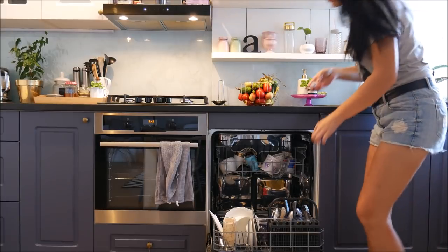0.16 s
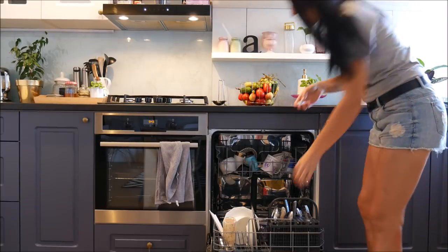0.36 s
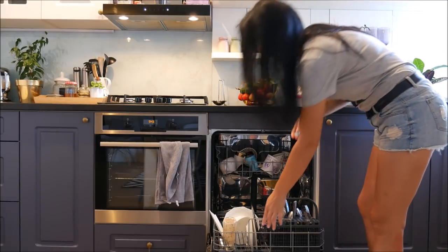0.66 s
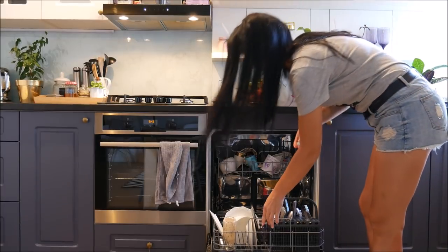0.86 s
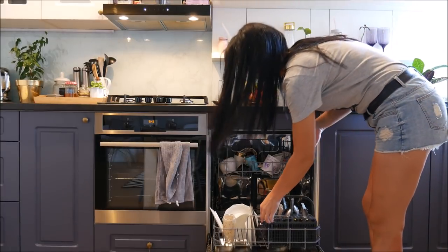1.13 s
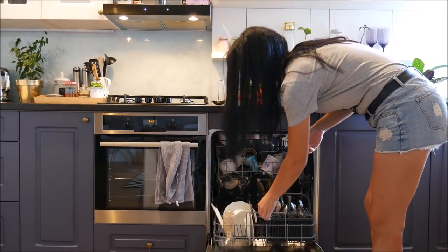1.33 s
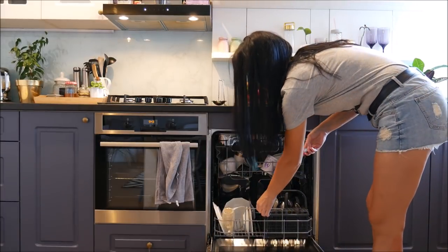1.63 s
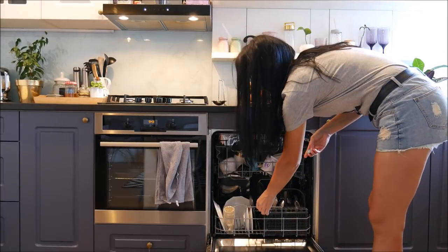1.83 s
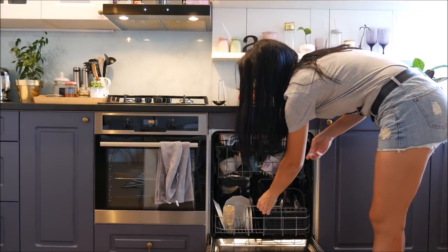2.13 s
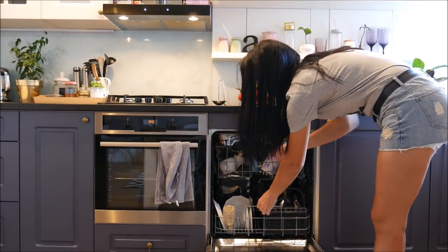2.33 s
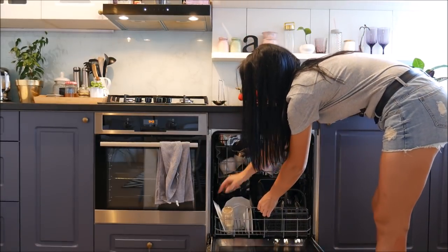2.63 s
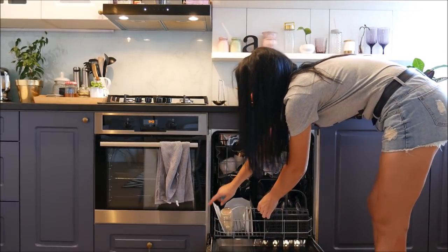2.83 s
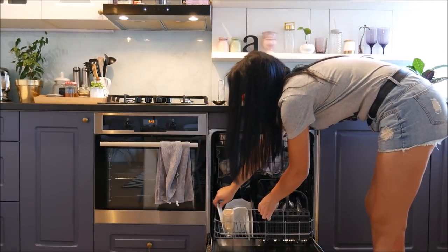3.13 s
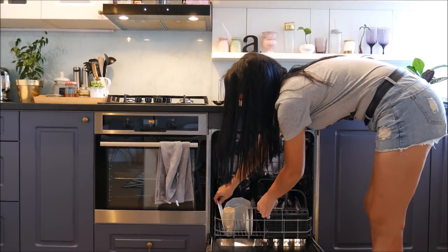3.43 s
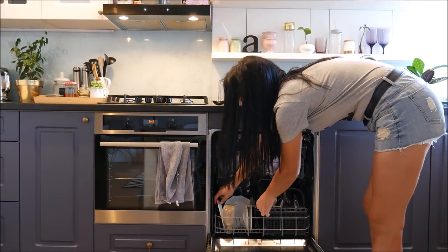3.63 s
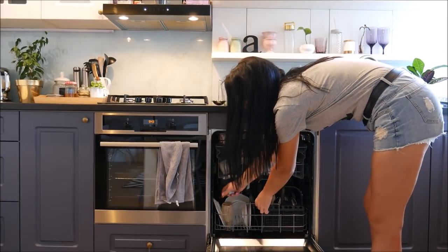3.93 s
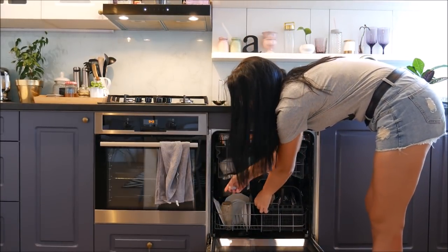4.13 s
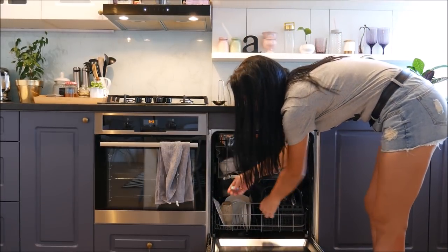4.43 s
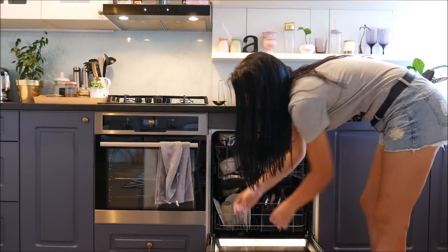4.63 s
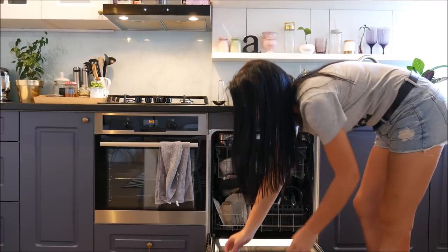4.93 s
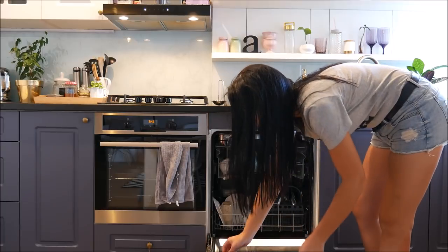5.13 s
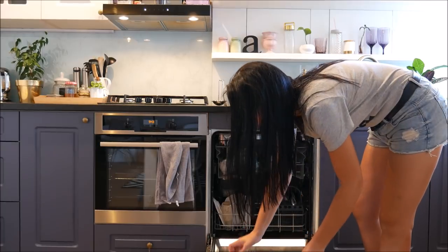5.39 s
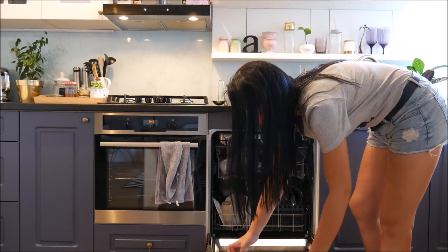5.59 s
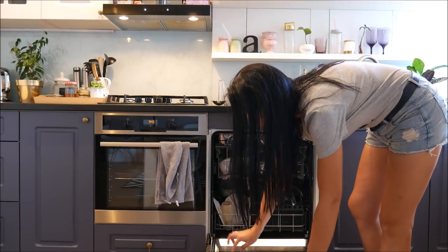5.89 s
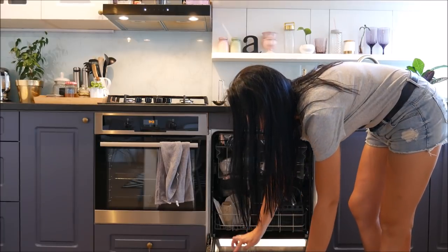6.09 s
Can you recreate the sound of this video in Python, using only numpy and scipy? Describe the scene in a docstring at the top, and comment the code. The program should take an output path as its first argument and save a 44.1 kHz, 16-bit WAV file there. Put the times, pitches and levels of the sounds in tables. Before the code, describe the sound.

A loaded lower dishwasher rack is pushed in bursts: low wheel rumble, rattling wire basket, dull tub bumps. Its main crash of plates comes early, ringing freely before choking off. Smaller clinks gather into another lively clatter midway, then only quiet knocks and footfalls remain until a hard double clack. Short bright kitchen reverberation, faint hush, stereo microphones nearby.

```python
"""China and cutlery clatter and clink amid duller knocks, wheel rumble and basket rattle; a sharp clack ends it.
Someone pushes the loaded lower rack of a dishwasher home in a hard-walled kitchen and reaches for the door.
Plates are banks of decaying sine modes; ticks, clacks and blows are short coloured noises;
wheels and basket wires are random grains shaped by the motion; the kitchen is decaying two-channel noise."""
import sys
import numpy as np
from scipy import signal
from scipy.fft import rfft, irfft, next_fast_len
from scipy.io import wavfile
from scipy.ndimage import uniform_filter1d, minimum_filter1d

SR = 44100
rng = np.random.default_rng(int(sys.argv[2]) if len(sys.argv) > 2 else 0)


def wav_out(sig):
    """Save sig, one row per channel (or a flat mono array), as 16-bit PCM at SR to the path in sys.argv[1]."""
    wavfile.write(sys.argv[1], SR, np.round(np.clip(np.atleast_2d(sig).T, -1, 1) * 32767).astype(np.int16))


N = 275709
TAIL_SAMPLES = next_fast_len(int(.65 * SR))
CONTACT_SAMPLES = int(.18 * SR)

# Single touches of china and cutlery. Each row: start in seconds, level in dB,
# upper over lowest modes in dB, ring time as a share of a free plate's.
CLINKS = [(1.324,-33.5,-9,0.13), (1.381,-31,5,0.39), (1.416,-34.5,10.5,0.4), (2.007,-40.5,5.5,0.16),
          (2.406,-73,20.5,0.82), (2.52,-41.5,0.5,0.088), (2.553,-35.5,4.5,0.16), (2.688,-30,2,0.13),
          (2.7,-33.5,-18,0.7), (2.719,-27,-2.5,0.3), (3.045,-30.5,2,0.12), (3.124,-39,7,0.14),
          (3.529,-61.5,-1,0.14), (3.59,-52.5,7.5,0.17), (3.616,-38,-2,0.097), (3.66,-44.5,-4,0.15),
          (3.723,-27.5,-7.5,0.49), (3.733,-26,-7.5,0.37), (3.785,-29,2.5,0.16), (3.843,-20.5,-5.5,0.2),
          (3.859,-27.5,4,0.56), (3.943,-38.5,-10,0.18), (4.099,-35.5,4.5,0.23), (4.159,-32.5,2.5,.36)]
# Bending modes of free plates. Each row: frequency in Hz, relative level in dB, t60 in seconds.
LOW_MODES = [(2297, -9, .28), (2336, -9, .24), (2430, -8, .14), (2503, 0, .4), (2555, -9, .11),
             (2720, -13, .16), (2940, -16, .14)]
UPPER_MODES = [(3560, -12, .14), (3724, -4.5, .32), (3790, -7, .14), (3862, -4, .24), (3962, 0, .3),
               (4008, -5, .2), (4440, -11, .24), (5160, -10, .18), (5240, -3, .25), (5300, -7, .2),
               (5868, -11, .22), (5924, -11, .22), (6238, -10, .24), (6805, -9, .24), (7196, -10, .18),
               (8320, -15, .26), (8930, -9, .22), (9640, -16, .24), (11000, -14, .24), (11250, -16, .24),
               (12290, -19, .24)]
PLATE_LONGEST_T60_S = .5
# The more freely a plate rings, the more its strongest modes stand out.
USUAL_RING_SHARE, SOLO_EXPONENT = 0.24, .45

# Spectra of the tick of a touch and the clack of the rack under it.
# Each row: frequency in Hz, relative density in dB per Hz.
TICK_SPECTRUM = [(1500, -26), (3000, -8), (5000, 3), (7000, 5.5), (9000, 2.5), (11000, -0.5),
                 (15000, -11.5)]
CLACK_SPECTRUM = [(60, -46.5), (150, -3), (400, -10.5), (750, 2), (1050, 2), (1350, 2), (1700, -2),
                  (2100, -1.5), (3200, -3), (6000, -38)]
# Tick and clack levels relative to the touch, then dB per dB of brightness and of force.
USUAL_TOUCH_DB = -35
TICK_DB, TICK_DB_PER_BRIGHTNESS_DB, TICK_DB_PER_FORCE_DB = -20.5, .9, 0.71
CLACK_DB, CLACK_DB_PER_BRIGHTNESS_DB, CLACK_DB_PER_FORCE_DB = -2.5, 0.78, -0.32
CLACK_TOP_BRIGHTNESS_DB = 6  # a brighter touch shakes the rack no more

# The rack hits its stop: the whole load joins in, chatters, holds, then dies away.
CRASH_S, CRASH_DB = 1.465, -14
CRASH_BUILD_DB, CRASH_BUILD_S = 2, 0.042
CRASH_HOLD_S, CRASH_FALL_DB_PER_S = 0.14, 165
CHATTER_GAP_S, CHATTER_JITTER_GAPS, CHATTER_SCATTER_DB = .0225, .1, -1.85
CRASH_BRIGHTNESS_DB, BRIGHTNESS_SCATTER_DB = 4, 2  # upper over lowest modes, and its spread
# The plates ring freely at first, then wedge against each other.
FIRST_RING_SHARE, WEDGED_RING_SHARE, WEDGING_S = 0.83, 0.3, 0.045

# Spectra of a blow's thump and panel. Each row: multiple of the part's pitch, relative density in dB per Hz.
THUMP_SPECTRUM = [(.2, -52), (.5, -30.5), (.82, -21.5), (1, 8.5), (1.2, -5.5), (1.7, -12), (3, -30.5),
                  (8, -58)]
PANEL_SPECTRUM = [(.15, -29), (.4, -3.5), (.65, -5.5), (.87, -1.5), (1, 2.5), (1.15, -7), (1.7, -13.5),
                  (3.5, -32), (9, -51)]
# Spectrum of a hard plastic snap. Each row: frequency in Hz, relative density in dB per Hz.
SNAP_SPECTRUM = [(700, -27.5), (1800, 7.5), (3500, 7), (6000, -1.5), (9000, -15.5), (15000, -19)]

# The rack bumps along its track. Each row: start in seconds, level in dB, boom of the tub in Hz.
BUMPS = [(1.324,-27,171.3), (1.362,-34,182), (1.464,-34,124.5), (1.64,-50,170), (2.01,-42,112.5),
         (3.785,-30.5,108), (4.039,-32.5,112), (4.188,-39.5,172)]
# The rack is jolted, then the tub booms. Each row: delay in seconds, thump in dB and panel in dB
# relative to the bump, panel in Hz.
JOLT = [(0,-0.5,-4,779), (.014,-8,-7,1074)]
RACK_THUMP_HZ = 328.2
BUMP_SNAP_DB, BUMP_TICK_DB = -7, -14.5  # relative to the panel

# Hard knocks on door, frame and crashing rack. Each row: start in seconds, panel in dB, panel in Hz,
# thump in dB, hardness in dB.
KNOCKS = [(.064,-61.5,1420,-67,2), (.756,-53,785,-66,-10), (0.963,-45.5,1920,-44.5,-2),
          (.977,-48,1150,-50.5,-2.5), (1.011,-45.5,1450,-58,-1), (1.157,-47.5,1320,-64,-2),
          (1.549,-20.5,1120,-35.5,6), (3.255,-44.5,1090,-59.5,3), (4.391,-50,1623,-62,2),
          (4.421,-52,1076,-69.5,3.5), (5.178,-37.5,930,-34.5,-1), (5.585,-65,553,-69.5,-5.5),
          (5.838,-58,1036,-70,2.5), (5.9,-41,1253,-45.5,-0.5), (6.147,-26,863,-35,3.5),
          (6.154,-33.5,827,-40,5.5)]
KNOCK_THUMP_HZ = 191
REBOUND_S, REBOUND_LOSS_DB = 0.02, 7
# Relative to the panel; snap also rises dB for dB with hardness.
KNOCK_SNAP_DB, KNOCK_TICK_DB, KNOCK_TICK_DB_PER_HARDNESS_DB = -6.5, -14.5, 3.2

# Footfalls. Each row: start in seconds, thump in dB, heel thump in Hz, floorboard in dB.
STEPS = [(.287,-45,315,-44), (2.444,-50.5,271,-60.5), (2.976,-40,290,-49), (4.955,-61,240.4,-67.5),
         (5.056,-44,228,-44.5)]
# Heel, sole and toe. Each row: delay in seconds, thump in dB relative to the step, thump pitch as a share
# of the heel's, floorboard in dB relative to the step, floorboard in Hz.
FOOTFALL = [(0,-3.5,1,-2,940), (.038,1,.8,-1.5,640), (.09,0,.74,-9,720)]
STEP_SNAP_DB, STEP_TICK_DB = -18.5, -20  # relative to the floorboard

# Pushes of the rack. Each row: start in seconds, end in seconds, wheel rumble in dB.
PUSHES = [(0.92,1.46,-44), (1.46,1.764,-39), (1.804,2.134,-48.5), (2.483,2.87,-44.5), (3.068,3.357,-50),
          (3.41,4.225,-43.5)]
PUSH_ATTACK_S, COAST_DB_PER_S = 0.055, 92
# Basket wires: relative to the rumble, relative to a touch's upper modes, and their decay after a touch.
WIRES_ROLLING_DB, WIRES_SHAKEN_DB, WIRES_T60_S = -17, -12.5, 0.34
# Spectra of wheels, basket wires and kitchen hush. Each row: frequency in Hz, relative density in dB per Hz.
RUMBLE_SPECTRUM = [(29, -58.5), (50, -32.5), (145, -6.5), (260, 3), (427, 1), (504, -2.5), (727, -3.5),
                   (812, -7), (1490, -11.5), (1850, -9.5), (4000, -27), (5200, -53.5), (8800, -120)]
RATTLE_SPECTRUM = [(1200, -8.5), (2500, -4.5), (4000, -2), (6500, -7.5), (10000, -4.5), (15000, -21)]
HUSH_SPECTRUM = [(15, -44), (25, -26), (54, -13), (207, 0), (462, -7.5), (978, -9.5), (1090, -15.5),
                 (1280, -10), (2700, -17), (5880, -22.5), (7890, -23), (9770, -21), (15000, -41.5)]
HUSH_DB = -65.5

# Decay of the kitchen. Each row: band centre in Hz, t60 in seconds.
ROOM_T60 = [(100, 0.22), (300, 0.41), (1000, 0.55), (3000, 0.42), (6000, 0.46), (12000, 0.3)]
# Likeness of left and right. Each row: frequency in Hz, correlation.
LIKENESS = [(40, 0.062), (150, 0.96), (400, 0.54), (1000, 0.73), (2400, 0.76), (4500, 0.96), (9000, 0.49),
            (13000, 0.7)]


def clinks(rooms, touches):
    """A touch ticks, sets the plates ringing and shakes the rack that holds them."""
    out = np.zeros((2, N))
    for k, (start_s, low_db, upper_db, tick_db, clack_db, ring) in enumerate(touches):
        room = rooms[k % len(rooms)]
        # the harder the contact, the more it wakes the highest modes
        tilt_db = np.clip(.3 * (tick_db - upper_db + 12), -3, 3)
        low = china(plates(LOW_MODES, ring), ring, room, tilt_db_per_octave=0, scatter_db=1.5)
        upper = china(plates(UPPER_MODES, ring), ring, room, tilt_db, scatter_db=2.5)
        tick = in_room(burst(TICK_SPECTRUM, t60_s=0.006, rise_s=0.0011), room)
        clack = in_room(burst(CLACK_SPECTRUM, t60_s=.08, rise_s=.002), room)
        ringing = from_db(low_db) * low + from_db(upper_db) * upper
        contact = from_db(tick_db) * tick + from_db(clack_db) * clack
        add(out, start_s, ringing + contact)
    return out


def china(modes, ring, room, tilt_db_per_octave, scatter_db):
    """Struck plates: each contact point favours other modes; leaning neighbours shorten the ring."""
    hz, db, t60_s = np.array(modes).T[:, :, None]
    pitch, strength, sign = rng.standard_normal((3, len(modes), 1))
    hz = hz * (1 + .0008 * pitch)
    gain = from_db(db + scatter_db * strength + tilt_db_per_octave * np.log2(hz / hz[0]))
    # mode levels hold at the microphones, whatever the room passes at their pitch
    room_power = uniform_filter1d(np.mean(np.abs(rfft(room)) ** 2, axis=0), size=11)
    passed = np.interp(hz, np.fft.rfftfreq(TAIL_SAMPLES, 1 / SR), room_power)
    gain = gain * np.sign(sign) / np.sqrt(passed)
    phase = np.float32(2 * np.pi * hz / SR) * np.arange(TAIL_SAMPLES, dtype=np.float32)
    waves = np.sin(phase) * dying(np.minimum(t60_s * ring, PLATE_LONGEST_T60_S))
    return in_room(np.sum(np.float32(gain) * waves, axis=0), room)


def plates(modes, ring):
    """The modes as one touch finds them: weak ones recede when the plate rings freely."""
    recession = max(ring / USUAL_RING_SHARE, 1) ** SOLO_EXPONENT
    return np.array(modes) * [1, recession, 1]


def all_touches():
    """Force and brightness share a touch out: s, lowest modes dB, upper modes dB, tick dB, clack dB, ring."""
    rows = []
    for start_s, db, bright_db, ring in list(CLINKS) + chatter():
        force_db = db - USUAL_TOUCH_DB
        clack_bright_db = min(bright_db, CLACK_TOP_BRIGHTNESS_DB)
        tick_db = db + TICK_DB + TICK_DB_PER_BRIGHTNESS_DB * bright_db + TICK_DB_PER_FORCE_DB * force_db
        clack_db = db + CLACK_DB + CLACK_DB_PER_BRIGHTNESS_DB * clack_bright_db
        clack_db += CLACK_DB_PER_FORCE_DB * force_db
        rows.append((start_s, db - bright_db / 2, db + bright_db / 2, tick_db, clack_db, ring))
    return rows


def chatter(count=14):
    """In the crash the plates strike each other in a quick, uneven run; rows as in CLINKS."""
    late, force, colour = rng.standard_normal((count, 3)).T
    strike = np.arange(count)
    after_s = CHATTER_GAP_S * (strike + CHATTER_JITTER_GAPS * late * (strike > 0))
    build_db = -CRASH_BUILD_DB * np.exp(-after_s / CRASH_BUILD_S)
    fall_db = -CRASH_FALL_DB_PER_S * np.maximum(after_s - CRASH_HOLD_S, 0)
    db = CRASH_DB + build_db + fall_db + CHATTER_SCATTER_DB * force
    bright_db = CRASH_BRIGHTNESS_DB + BRIGHTNESS_SCATTER_DB * colour
    freedom = np.exp(-after_s / WEDGING_S)
    ring = WEDGED_RING_SHARE + (FIRST_RING_SHARE - WEDGED_RING_SHARE) * freedom
    return list(zip(CRASH_S + after_s, db, bright_db, ring))


def knocks(rooms):
    """A heavy part thumps, sheet metal and boards answer in the middle, hard plastic snaps and ticks on top."""
    out = np.zeros((2, N))
    for k, (start_s, thump_db, thump_hz, panel_db, panel_hz, snap_db, tick_db) in enumerate(all_blows()):
        room = rooms[k % len(rooms)]
        thump = burst(np.array(THUMP_SPECTRUM) * [thump_hz, 1], t60_s=0.087, rise_s=0.012)
        panel = burst(np.array(PANEL_SPECTRUM) * [panel_hz, 1], t60_s=.065, rise_s=.0015)
        snap = burst(SNAP_SPECTRUM, t60_s=.025, rise_s=.001)
        tick = burst(TICK_SPECTRUM, t60_s=.024, rise_s=.0018)
        for db, part in (thump_db, thump), (panel_db, panel), (snap_db, snap), (tick_db, tick):
            add(out, start_s, from_db(db) * in_room(part, room))
    return out


def all_blows():
    """Feet roll from heel to toe, the rack jolts the tub, and each hard knock rebounds once."""
    rows = []
    for start_s, thump_db, heel_hz, board_db in STEPS:
        footfall = [(delay_s, thump, share * heel_hz, *board) for delay_s, thump, share, *board in FOOTFALL]
        rows += contacts(start_s, thump_db, board_db, footfall, STEP_SNAP_DB, STEP_TICK_DB)
    for start_s, db, boom_hz in BUMPS:
        jolt = [(delay_s, thump, hz, *panel)
                for (delay_s, thump, *panel), hz in zip(JOLT, (RACK_THUMP_HZ, boom_hz))]
        rows += contacts(start_s, db, db, jolt, BUMP_SNAP_DB, BUMP_TICK_DB)
    for start_s, panel_db, panel_hz, thump_db, hardness_db in KNOCKS:
        bounce = [(k * REBOUND_S, -k * REBOUND_LOSS_DB, KNOCK_THUMP_HZ, -k * REBOUND_LOSS_DB, panel_hz)
                  for k in (0, 1)]
        snap_db = KNOCK_SNAP_DB + hardness_db
        tick_db = KNOCK_TICK_DB + KNOCK_TICK_DB_PER_HARDNESS_DB * hardness_db
        rows += contacts(start_s, thump_db, panel_db, bounce, snap_db, tick_db)
    return rows


def contacts(start_s, thump_db, panel_db, pattern, snap_db, tick_db):
    """The contacts of one blow: s, thump dB, thump Hz, panel dB, panel Hz, snap dB, tick dB."""
    rows = []
    for delay_s, thump, thump_hz, panel, panel_hz in pattern:
        level_db = panel_db + panel
        rows.append((start_s + delay_s, thump_db + thump, thump_hz,
                     level_db, panel_hz, level_db + snap_db, level_db + tick_db))
    return rows


def burst(spectrum, t60_s, rise_s):
    """Many heavily damped modes merge into a short noise that swells while the contact closes."""
    closing = 1 - np.exp(-np.arange(CONTACT_SAMPLES) / SR / max(rise_s, 1e-5))
    noise = coloured(rng.standard_normal(CONTACT_SAMPLES), spectrum)
    return noise * closing * dying(t60_s, size=CONTACT_SAMPLES)


def rolling(room, touches):
    """The wheels judder along their track; the wire basket rattles with them and after each touch."""
    t = np.arange(N) / SR
    pushes = []
    for start_s, end_s, db in PUSHES:
        attack = np.clip((t - start_s) / PUSH_ATTACK_S, 0, 1)
        pushes.append(attack * from_db(db - COAST_DB_PER_S * np.maximum(t - end_s, 0)))
    moving = np.max(pushes, axis=0)
    shaken_power = np.zeros((1, N))
    for start_s, _, upper_db, *_ in touches:
        shake = from_db(upper_db + WIRES_SHAKEN_DB) * dying(WIRES_T60_S)[None]
        add(shaken_power, start_s, shake ** 2)
    wheels = moving * coloured(grains(per_s=900, spread_db=-1.0), RUMBLE_SPECTRUM)
    wire_level = from_db(WIRES_ROLLING_DB) * moving + np.sqrt(shaken_power[0])
    wires = wire_level * coloured(grains(per_s=100, spread_db=2.0), RATTLE_SPECTRUM)
    return signal.fftconvolve((wheels + wires)[None], room / np.linalg.norm(room), axes=1)[:, :N]


def grains(per_s, spread_db):
    """Tiny contacts at random moments, of uneven size."""
    sizes = from_db(spread_db * np.minimum(rng.exponential(1, N), 4))
    return (rng.random(N) < per_s / SR) * sizes * rng.standard_normal(N)


def kitchen_hush():
    """Quiet steady noise arriving from all around."""
    return from_db(HUSH_DB) * coloured(diffuse(next_fast_len(N))[:, :N], HUSH_SPECTRUM)


def kitchen(direct_db, tub_db, tub_t60_s):
    """Direct sound, quick reflections in the steel tub, and the room's tail dying band by band."""
    noise, hz = rfft(diffuse(TAIL_SAMPLES)), np.fft.rfftfreq(TAIL_SAMPLES, 1 / SR)
    tail = 0
    for centre_hz, t60_s in ROOM_T60:
        share = at_hz([(f, float(f == centre_hz)) for f, _ in ROOM_T60], hz)
        tail = tail + irfft(noise * share, TAIL_SAMPLES) * dying(t60_s)
    tub = diffuse(TAIL_SAMPLES) * dying(tub_t60_s)
    room = (rms_one(tail) + from_db(tub_db) * rms_one(tub)) / np.sqrt(TAIL_SAMPLES)
    room[:, 0] += from_db(direct_db)
    return room


def diffuse(size):
    """White noise as two close microphones hear it from all around."""
    mid, side = rfft(rng.standard_normal((2, size)))
    alike = np.clip(at_hz(LIKENESS, np.fft.rfftfreq(size, 1 / SR)), -.95, .95)
    return irfft(np.sqrt(1 + alike) * mid + np.sqrt(1 - alike) * side * [[1], [-1]], size)


def in_room(x, room):
    """A blow as it reaches the microphones, with the energy of 30 ms at rms 1."""
    wet = signal.fftconvolve(x[None].astype(np.float32), room.astype(np.float32), axes=1)[:, :TAIL_SAMPLES]
    return wet / np.sqrt(np.sum(wet ** 2) / 2 / (.03 * SR))


def coloured(x, spectrum):
    """Give a noise its spectrum; rms 1."""
    size = next_fast_len(x.shape[-1])
    gain = from_db(at_hz(spectrum, np.fft.rfftfreq(size, 1 / SR)))
    return rms_one(irfft(rfft(x, size) * gain, size)[..., :x.shape[-1]])


def dying(t60_s, size=TAIL_SAMPLES):
    """Envelope that falls by 60 dB in t60_s."""
    rate = np.float32(np.log(1000) / SR / np.maximum(t60_s, 1e-3))
    return np.exp(-np.minimum(rate * np.arange(size, dtype=np.float32), 40))


def at_hz(points, hz):
    """Read a table on a log-frequency axis."""
    points = np.array(points)
    return np.interp(np.log(np.maximum(hz, 1)), np.log(points[:, 0]), points[:, 1])


def from_db(db):
    """Amplitude from decibels."""
    return 10 ** (np.asarray(db) / 20)


def rms_one(x):
    """Scale to rms 1 over all channels."""
    return x / np.sqrt(np.mean(x ** 2) + 1e-20)


def add(out, start_s, sound):
    """Mix a sound in at start_s."""
    start = max(round(start_s * SR), 0)
    out[:, start:start + sound.shape[1]] += sound[:, :max(N - start, 0)]


def scene(places=7):
    """Touches and blows take turns among several sets of echoes; the kitchen has a quiet hush."""
    rooms = [kitchen(direct_db=-9, tub_db=-8, tub_t60_s=0.14) for _ in range(places)]
    hush = kitchen_hush()
    touches = all_touches()
    return clinks(rooms, touches) + knocks(rooms) + rolling(rooms[0], touches) + hush


def limiter(x, ceiling_db, release_db_per_s):
    """The gain ducks just ahead of a peak and recovers steadily."""
    over_db = np.maximum(20 * np.log10(np.abs(x).max(axis=0) + 1e-9) - ceiling_db, 0)
    ramp_db = release_db_per_s * np.arange(N) / SR
    duck_db = np.maximum.accumulate(over_db + ramp_db) - ramp_db
    gain_db = uniform_filter1d(minimum_filter1d(-duck_db, size=65), size=65)
    return x * from_db(gain_db)


def record(dry):
    """Deep bass rolled off, a narrow notch in the treble, a limiter, then the top cut."""
    bass_cut_hz, top_cut_hz = 68, 15500
    notch_hz, notch_width_hz = 7850, 400
    lean = signal.sosfilt(signal.butter(2, bass_cut_hz, "high", fs=SR, output="sos"), dry)
    notched = signal.lfilter(*signal.iirnotch(notch_hz, notch_hz / notch_width_hz, fs=SR), lean)
    held = limiter(notched, ceiling_db=-3, release_db_per_s=1000)
    return signal.sosfilt(signal.ellip(12, .1, 80, top_cut_hz, fs=SR, output="sos"), held)


dry = scene()
out = record(dry)
wav_out(out)
```